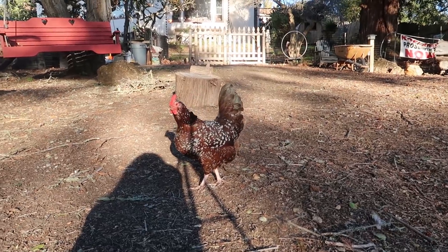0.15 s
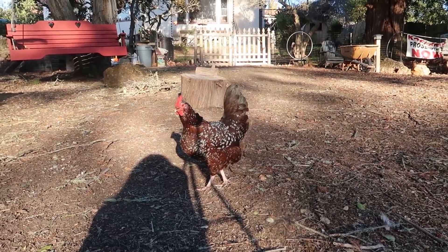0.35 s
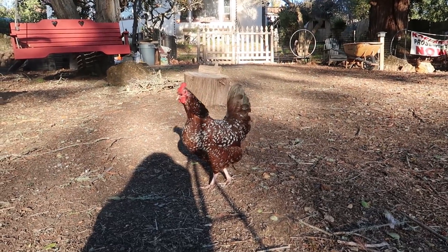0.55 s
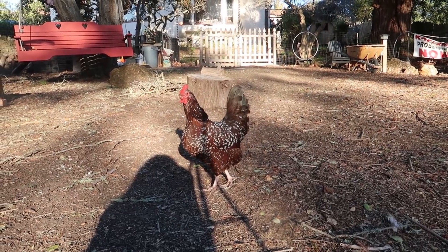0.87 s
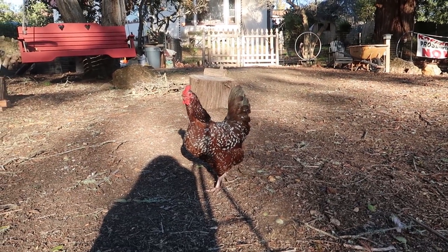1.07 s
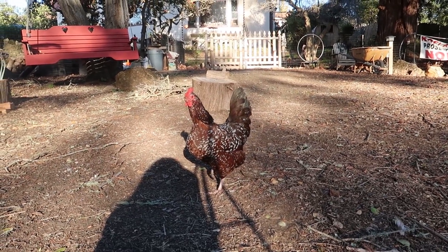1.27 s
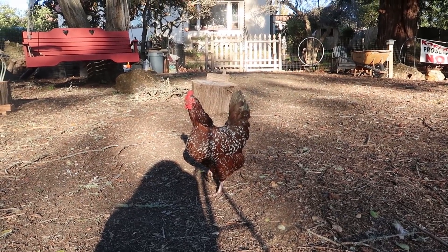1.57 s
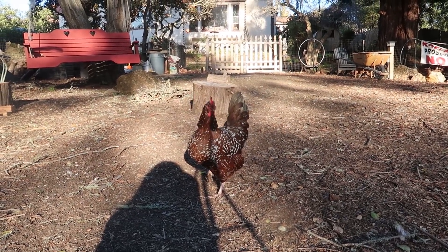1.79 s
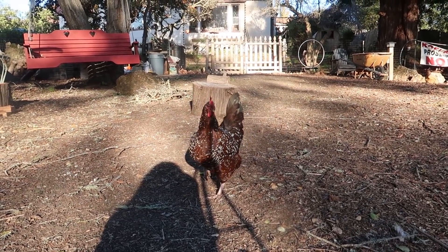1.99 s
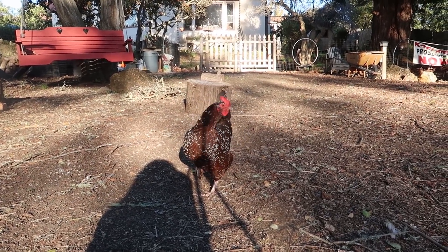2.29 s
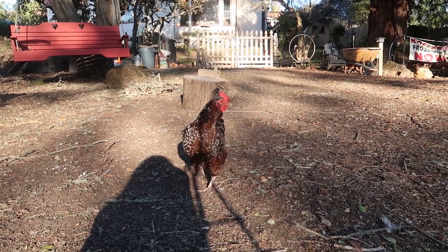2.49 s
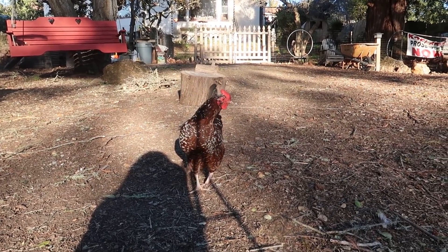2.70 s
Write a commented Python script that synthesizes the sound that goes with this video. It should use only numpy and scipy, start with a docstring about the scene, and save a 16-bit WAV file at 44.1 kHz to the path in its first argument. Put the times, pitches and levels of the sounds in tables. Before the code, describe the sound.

A hen near the microphone gives short, throaty clucks at about 0.2 and 0.44 seconds, then a loud, harsh squawk from 0.54 to 0.72. Seven abrupt clucks follow from 0.87 to 2.5, roughly every quarter second. From 1.05 to 2.7 a distant hen clucks softly in between, strongest near 2.3. Sparse yard echoes and faint outdoor wash surround them; a low hum rises slightly after 2.7.

```python
"""A hen close by gives alarm clucks and one long squawk: a pulsed source excites the resonances of throat and beak.
A second hen further off clucks softly by the same principle, coloured by the path across the yard.
Fences return the calls as sparse decaying echoes; filtered noise forms an outdoor wash and a low hum,
which rises at the end. A gain control ducks the sound when the squawk comes and recovers slowly."""
import sys
import numpy as np
from scipy import signal
from scipy.io import wavfile
from scipy.ndimage import uniform_filter1d

SR = 44100
rng = np.random.default_rng(int(sys.argv[2]) if len(sys.argv) > 2 else 0)


def file_out(sig):
    """Save sig as 16-bit WAV at sys.argv[1]."""
    # one column per channel
    cols = np.atleast_2d(sig).T
    # limit, then scale
    lim = np.clip(cols, -1, 1)
    pcm = np.round(lim * 32767).astype(np.int16)
    wavfile.write(sys.argv[1], SR, pcm)


N = 125685

# Squawk contour: t/s, level/dB, f/Hz, roughness/1
SQUAWK_CONTOUR = [(.536, -17.5, 545.6, 0.26), (0.542, -7, 545.2, 0.31), (0.556, -5.5, 613.5, 0),
                  (0.574, -4, 631.8, .25), (0.6, -4, 629.8, 0.41), (0.619, -5, 621.4, 0.04),
                  (0.672, -5, 608.3, 0), (0.681, -6.5, 592.8, 0.3), (0.695, -6.5, 547.2, 0.55),
                  (0.7, -14.5, 554, 0.18), (0.714, -13.5, 585.5, 0.2), (0.725, -41.5, 470, 0.2)]
# Throat spectrum during the squawk: f/Hz, relative level/dB
SQUAWK_SPECTRUM = [(150, -58), (300, -16.5), (610, -18), (850, -2), (1060, 12.5), (1250, 1.5), (1500, 0),
                   (1850, -3), (2460, -2), (4300, -22), (5500, -20), (11900, -37.5), (16000, -63)]
# Near clucks: start t/s, length t/s, effort level/dB, top f/Hz, share of length at top/1,
# starting share of top f/1, starting level step/dB, roughness/1 before the tail
NEAR_CLUCKS = [(0.197, 0.051, -22, 269.8, 0.29, 0.8, -8.5, 0.45),
               (0.438, 0.058, -17.5, 296.6, 0.44, 0.79, -13.5, 0.54),
               (0.868, 0.066, -16.5, 312.8, 0.28, 0.91, -8, 0.54),
               (1.136, 0.058, -18, 312.2, 0.43, 0.83, -1.5, 0.41),
               (1.448, 0.055, -19.5, 274.5, 0.45, 0.89, -7.5, 0.28),
               (1.723, 0.0526, -14.5, 297, 0.24, 0.94, -4.5, 0.03),
               (2.006, 0.053, -16, 280, 0.393, .92, -2.5, 0.36),
               (2.265, 0.054, -14.5, 278.6, 0.47, 0.7, -11.5, 0.25),
               (2.517, 0.061, -15.5, 285, 0.42, 0.67, -7, 0.41)]
# Resonances of throat and open beak: f/Hz, level/dB
RESONANCES = [(280, -14.5), (560, -20), (870, -2.5), (1130, 8), (2200, -9.5), (3100, -10), (4200, -19),
              (5900, -31), (9500, -39.5)]
# Bandwidth of each pole in the double-pole resonances, in the same order: f/Hz
POLE_WIDTHS = [200, 300, 260, 190, 430, 480, 460, 1900, 5000]
# Effect of a beak still shut: f/Hz, level/dB per share of pitch still to climb
SHUT_BEAK_LEVEL = [(1200, -2), (2200, -23), (3100, -6.5)]
# Upward shift by a beak still shut: f/Hz, share of f per share of pitch still to climb/1
SHUT_BEAK_SHIFT = [(2200, 0.26), (3100, 0.89), (4200, 0)]
# Far clucks: start t/s, length t/s, effort level/dB, top f/Hz
DISTANT_CLUCKS = [(1.053, 0.042, -41.5, 529), (1.223, 0.0386, -47, 430.6), (1.403, 0.04, -45.5, 427),
                  (1.613, 0.037, -44, 429), (1.789, 0.056, -43.5, 434), (1.977, 0.051, -36.5, 455),
                  (2.152, 0.049, -32.5, 581), (2.31, 0.043, -31.5, 577.3), (2.484, 0.074, -35, 527),
                  (2.699, 0.047, -38.5, 458.6)]
# Colour of the far calls: f/Hz, relative level/dB
FAR_SPECTRUM = [(250, 18), (450, 19.5), (1100, -0.5), (1700, 19), (3300, -7), (3900, 13.5), (12000, -7)]
# Reverberation: f/Hz, time to fall by 60 dB t/s
YARD_DECAY = [(1200, 0.45), (8000, 0.54)]
# Outdoor wash: f/Hz, relative density level/dB per Hz
WASH_SPECTRUM = [(25, -26), (100, -10.5), (220, -12.5), (1100, -11), (12000, -38), (16000, -62)]
# Hum contour: t/s, level/dB
HUM_CONTOUR = [(0, -74), (2.697, -64), (2.85, -49.5)]
# Stereo difference: f/Hz, side over mid level/dB
SIDE_SPECTRUM = [(500, -60), (2000, -29), (4000, -8), (15000, -1)]

SECOND_HZ = 1052.5  # second vibration, held near a throat resonance
SECOND_DB = -10.5  # its tone before the throat, relative to flutter depth times call level
FLUTTER, FLUTTER_PER_ROUGH = 0.16, 0.78  # least depth, and depth added per unit roughness
ATTACK_S, END_DB, END_PITCH, ROUGH_TAIL = 0.00044, -11, 0.74, 0.67  # near clucks
DULL = 0.34  # loss in dB per octave above 1 kHz, per dB of lost effort
REOPEN, REOPEN_AT = 0.14, 0.452  # second pulse: size towards the treble, place in the cycle
BEAK_FOLLOWS = 0.75  # share of pitch change followed by the resonances, less above 3 kHz
WANDER_DB = 3  # rms level wander of the resonances above 1.5 kHz
FAR_START_HZ, FAR_ENDS_DB, FAR_ROUGH = 413.6, -6.5, 0.22
NEAR_WET_DB, FAR_WET_DB, FENCE_S = -23.5, -9, 0.022  # echo levels and least echo delay
WASH_DB, HUM_HZ, HUM_WIDTH_HZ = -56.5, 119.5, 5.5
PORT_TURN, PORT_DRIFT = 1.7, 0.8  # side phase and its rms drift in radians
DUCK_FROM_DB, DUCK_SHARE, RECOVER_DB_PER_S, GRAB_S = -12.5, 1, 9, 0.0007
CEILING, FLOOR = 0.79, -0.64  # the input overloads sooner on one side
EDGE_HZ = 16000


def squawk():
    """Intermodulation: a second vibration beats with twice the pitch, fluttering the call and adding side tones."""
    s, *columns = np.transpose(SQUAWK_CONTOUR)
    t = np.arange(s[0], s[-1], 1 / SR)
    level_db, hz, rough = (np.interp(t, s, column) for column in columns)
    depth = np.minimum(FLUTTER + FLUTTER_PER_ROUGH * rough, 0.3)
    phase_wander = 1.2 * evened(uniform_filter1d(rng.standard_normal(len(t)), size=400))
    second = 2 * np.pi * SECOND_HZ * t + phase_wander
    beat = 4 * np.pi * np.cumsum(hz) / SR - second
    flutter = depth * (np.cos(beat) + 0.6 * np.cos(2 * beat))
    call = voice(hz, level_db, rough, lambda x: colour(x, SQUAWK_SPECTRUM), flutter, wobble=0.2)
    second_tone = depth * gain_of(level_db + SECOND_DB) * np.cos(second)
    add(call, 0, colour(second_tone, SQUAWK_SPECTRUM))
    return s[0], call


def cluck(start, length, effort_db, top_hz, top, first, step_db, rough):
    """Pulsed phonation under an envelope: a sharp onset, an arch of pitch and level, and a rough, sagging tail."""
    t = np.arange(0, length, 1 / SR)
    rise = np.clip(1 - t / length / top, 0, 1)  # 1 at the start, 0 at the top
    fall = np.clip((t / length - top) / (1 - top), 0, 1)  # 0 at the top, 1 at the end
    hz = top_hz * (1 - (1 - first) * rise ** 1.56 - (1 - END_PITCH) * fall ** 2)
    snap_db = -30 * np.clip(1 - t / ATTACK_S, 0, 1)
    level_db = effort_db + snap_db + step_db * rise ** 4.3 + END_DB * fall ** 3.7
    scale = 1 + BEAK_FOLLOWS * (hz / top_hz - 1)
    shut = (1 - first) * rise
    return start, voice(hz, level_db, rough + ROUGH_TAIL * fall ** 2, lambda x: throat(x, scale, shut))


def voice(hz, level_db, rough, tract, flutter=0, wobble=0.12):
    """Source-filter principle: cyclic pulses and noise puffs from the voice membranes excite the tract."""
    shake, noise = rng.standard_normal((2, 9000))[:, :len(hz)]
    jitter = wobble * rough * evened(uniform_filter1d(shake, size=90))
    turns = np.cumsum(hz * (1 + jitter)) / SR - 0.36
    k = np.arange(1, int(16000 / hz.max()))[:, None]  # harmonic numbers
    octaves = np.log2(np.maximum(k * hz / 1000, 1))
    dull = gain_of(DULL * (level_db - level_db.max()) * octaves)
    reopening = REOPEN * np.tanh(k * hz / 4000) * np.cos(2 * np.pi * k * (turns - REOPEN_AT))
    snaps = np.cos(2 * np.pi * k * turns) + reopening
    breath = signal.lfilter([1, -0.6], 1, noise)
    puffs = evened((0.34 + np.exp(-(turns % 1) / 0.5)) * breath) * dull[len(k) // 4]
    pulses = (dull * snaps).sum(0) / np.sqrt(len(k) / 2) * (1 + flutter)
    drive = np.clip(1 - rough, 0, 1) * pulses + abs(rough) * puffs
    ringing = tract(np.r_[-drive * gain_of(level_db), np.zeros(1500)])  # room for the resonances to die away
    return ringing / np.sqrt(np.mean(tract(drive) ** 2))


def throat(x, scale, shut=0.):
    """Parallel resonance: double poles move with the curve scale; a beak still shut shifts and reweights them."""
    scale, shut = (np.pad(c * np.ones(len(scale)), (0, len(x) - len(scale)), "edge") for c in (scale, shut))
    out = 0
    for k, ((hz, db), width) in enumerate(zip(RESONANCES, POLE_WIDTHS)):
        centre = scale ** min(1, (3000 / hz) ** 2) + read(SHUT_BEAK_SHIFT, hz) * shut
        turn = np.exp(2j * np.pi * hz * np.cumsum(centre) / SR)
        wander = evened(uniform_filter1d(rng.standard_normal(9000), size=550))[:len(x)]
        db = db + (hz > 1500) * WANDER_DB * wander
        gain = (-1) ** k * gain_of(db + read(SHUT_BEAK_LEVEL, hz) * shut)
        r = np.exp(-np.pi * width / SR)
        # Shift the moving centre to zero frequency, filter there, then shift back
        ring = signal.lfilter([(1 - r) ** 2], [1, -2 * r, r * r], x / turn)
        out = out + gain * (turn * ring).real
    return out


def far_cluck(start, length, effort_db, top_hz):
    """Pulsed phonation with parabolic pitch and level, coloured by the path across the yard."""
    u = 2 * np.arange(0, length, 1 / SR) / length - 1  # -1 at the start, 1 at the end
    drop_hz = np.where(u < 0, top_hz - FAR_START_HZ, 0.103 * top_hz)
    hz = top_hz - drop_hz * u ** 2
    level_db = effort_db + FAR_ENDS_DB * u ** 2
    return start, voice(hz, level_db, FAR_ROUGH,
                        lambda x: colour(throat(x, np.ones_like(hz)), FAR_SPECTRUM))


def yard(x):
    """Reverberation: sparse echoes of random sign, each band decaying exponentially at its own rate."""
    taps, first = np.zeros(SR), int(FENCE_S * SR)
    at = np.arange(0, SR - 20, 20) + rng.integers(0, 20, SR // 20 - 1)
    taps[at] = rng.choice([-1., 1.], len(at)) * (at > first)
    hz, t, z = signal.stft(taps, SR, nperseg=256)
    decay = gain_of(-60 * t / read(YARD_DECAY, hz)[:, None])
    tail = signal.istft(z * decay, SR, nperseg=256)[1]
    return signal.fftconvolve(x, tail / np.linalg.norm(tail))[:N]


def outdoor_wash():
    """Shaped noise: random spectral components follow a broad spectrum with patches in time and frequency."""
    frames, hz = N // 256 + 5, np.fft.rfftfreq(1024, 1 / SR)
    a, b, patches = rng.standard_normal((frames, 513, 3)).T
    patches = uniform_filter1d(patches, size=12, axis=0)
    patches = evened(uniform_filter1d(patches, size=14, axis=1))
    z = (a + 1j * b) * gain_of(read(WASH_SPECTRUM, hz)[:, None] + 2.9 * patches)
    return gain_of(WASH_DB) * evened(signal.istft(z, nperseg=1024, noverlap=768)[1][:N])


def low_hum():
    """Narrow-band resonance: noise through a sharp peak gives a low tone of wavering level."""
    peak = signal.iirpeak(HUM_HZ, HUM_HZ / HUM_WIDTH_HZ, SR)
    hum = evened(signal.lfilter(*peak, rng.standard_normal(N)))
    return gain_of(np.interp(np.arange(N) / SR, *np.transpose(HUM_CONTOUR))) * hum


def colour(x, points):
    """Minimum-phase filtering: the log magnitude fixes the phase of a causal response."""
    level_db = np.maximum(read(points, abs(np.fft.fftfreq(8192, 1 / SR))), -100)
    log_gain = np.log(gain_of(level_db))
    taps = np.fft.ifft(np.exp(np.conj(signal.hilbert(log_gain)))).real[:2048]
    return signal.oaconvolve(x, taps)[:len(x)]


def gain_of(db):
    """Logarithmic level: decibels become an amplitude ratio."""
    return 10 ** (np.asarray(db) / 20)


def evened(x):
    """Power normalisation: scales to unit rms."""
    return x / np.sqrt(np.mean(x ** 2) + 1e-20)


def read(points, hz):
    """Logarithmic frequency scale: interpolates a spectrum table."""
    f, value = np.transpose(points)
    return np.interp(np.log(hz + 1), np.log(f + 1), value)


def add(mix, s, sound):
    """Superposition: adds a sound to the mix from time s in seconds."""
    part = mix[round(s * SR):][:len(sound)]
    part += sound[:len(part)]


def scene():
    """Superposition of both hens, echoes and background at two close ports that differ mainly in the treble."""
    near, far = np.zeros((2, N))
    add(near, *squawk())
    for row in NEAR_CLUCKS:
        add(near, *cluck(*row))
    for row in DISTANT_CLUCKS:
        add(far, *far_cluck(*row))
    echoes = yard(gain_of(NEAR_WET_DB) * near + gain_of(FAR_WET_DB) * far)
    mid = near + far + echoes + outdoor_wash() + low_hum()
    hz, _, z = signal.stft(mid, SR, nperseg=256, noverlap=192)
    drift = uniform_filter1d(rng.standard_normal(z.shape), size=6, axis=0)
    drift = evened(uniform_filter1d(drift, size=30, axis=1))
    z = z * gain_of(read(SIDE_SPECTRUM, hz)[:, None]) * np.exp(1j * (PORT_TURN + PORT_DRIFT * drift))
    side = signal.istft(z, nperseg=256, noverlap=192)[1][:N]
    return np.array([mid + side, mid - side])


def record(dry):
    """Dynamic compression: quick gain reduction and slow recovery, then asymmetric clipping and a low-pass."""
    power = uniform_filter1d((dry ** 2).mean(0), size=600, origin=299)  # averages over the past
    power_db = 10 * np.log10(abs(power) + 1e-12)
    fall = np.arange(N) * RECOVER_DB_PER_S / SR
    held_db = np.maximum.accumulate(power_db + fall) - fall
    over_db = np.maximum(held_db - DUCK_FROM_DB, 0)
    r = np.exp(-1 / (GRAB_S * SR))
    ducked = dry / gain_of(DUCK_SHARE * signal.lfilter([1 - r], [1, -r], over_db))
    clipped = np.clip(ducked, FLOOR, CEILING)
    low_pass = signal.firwin(511, EDGE_HZ, window=("kaiser", 9), fs=SR)
    return signal.oaconvolve(clipped, low_pass[None], "same")


dry = scene()
out = record(dry)
file_out(out)
```